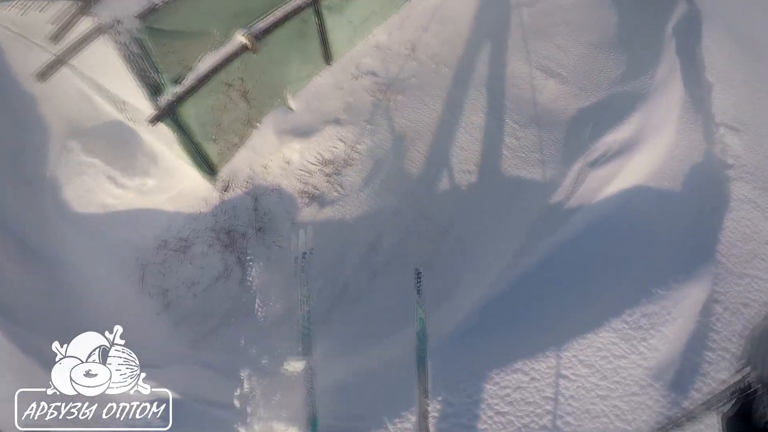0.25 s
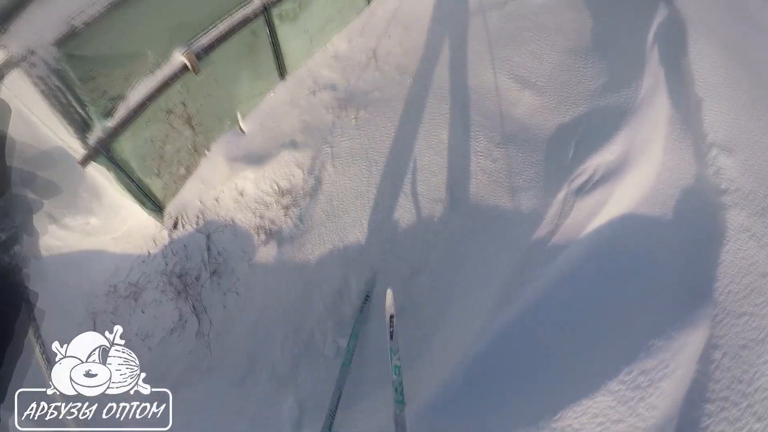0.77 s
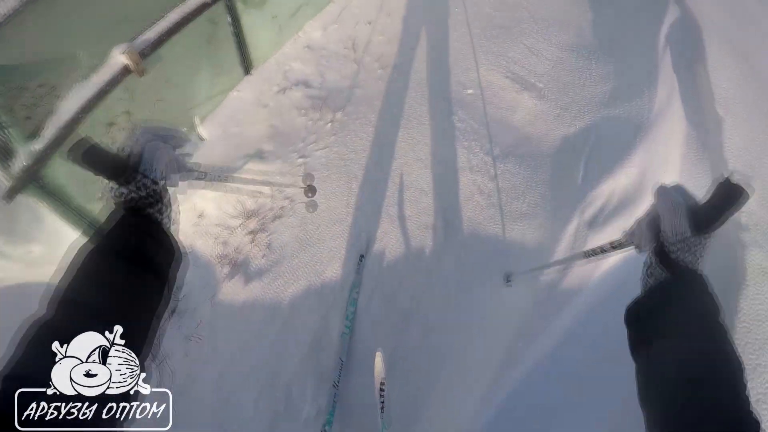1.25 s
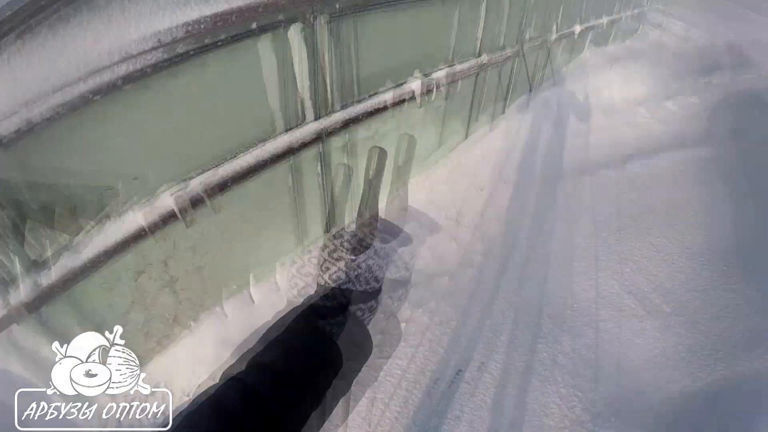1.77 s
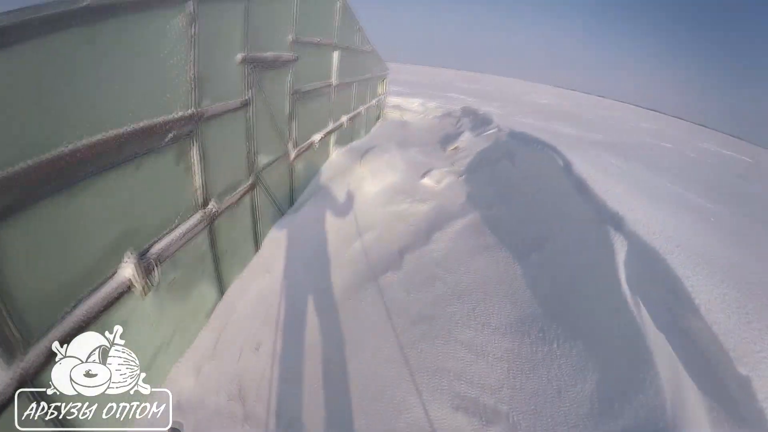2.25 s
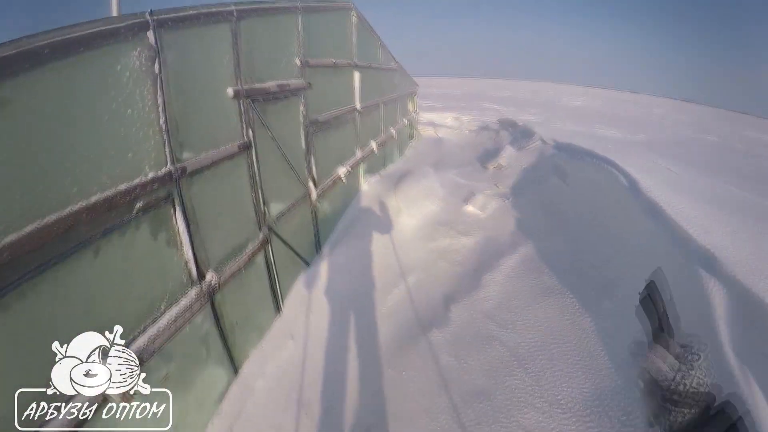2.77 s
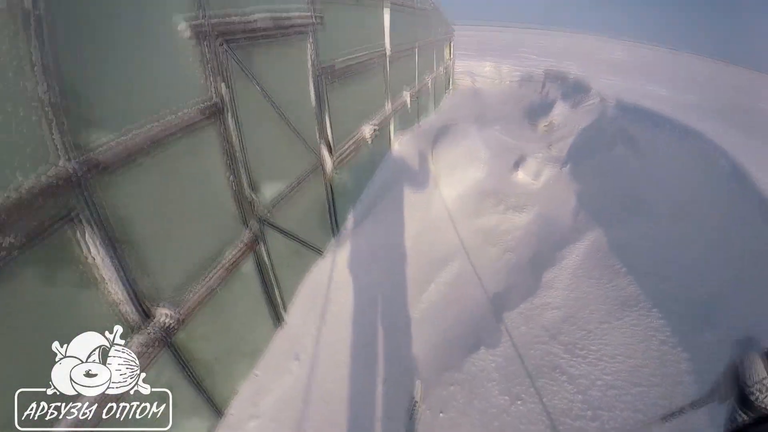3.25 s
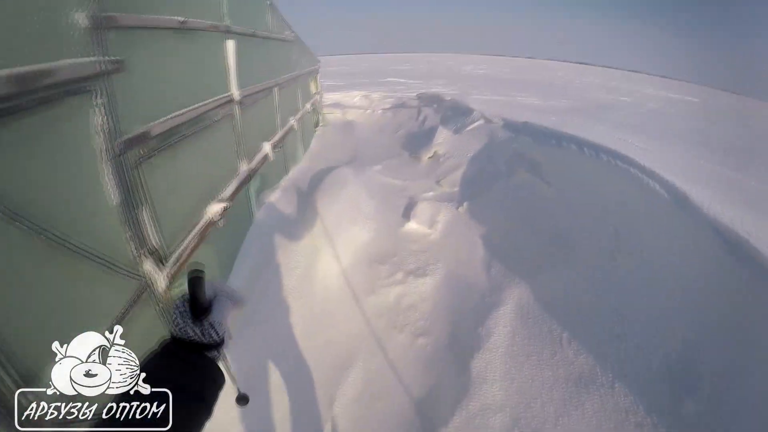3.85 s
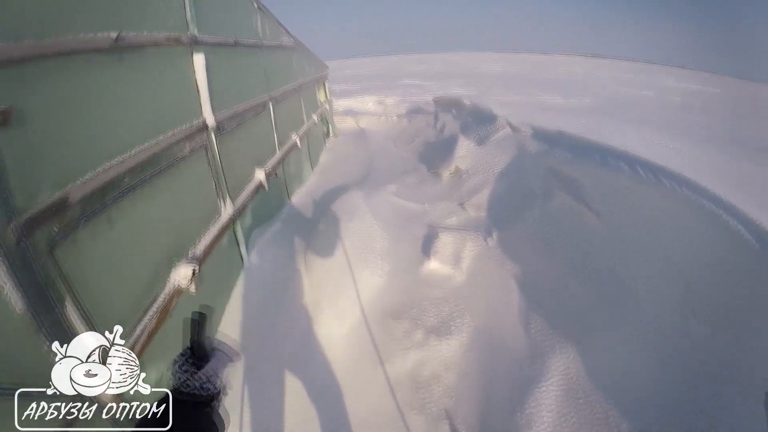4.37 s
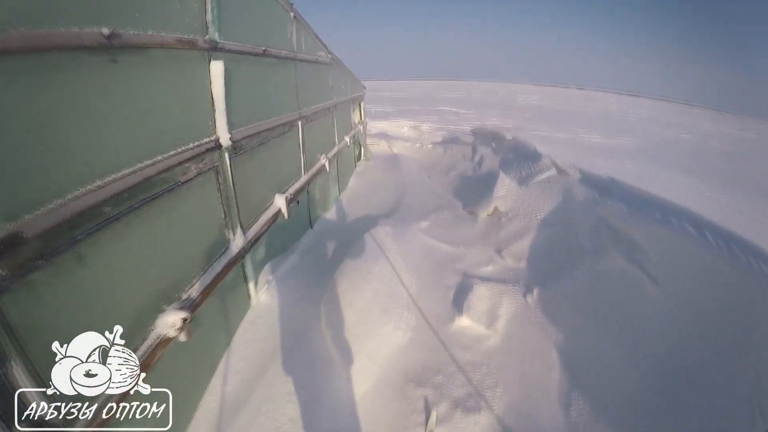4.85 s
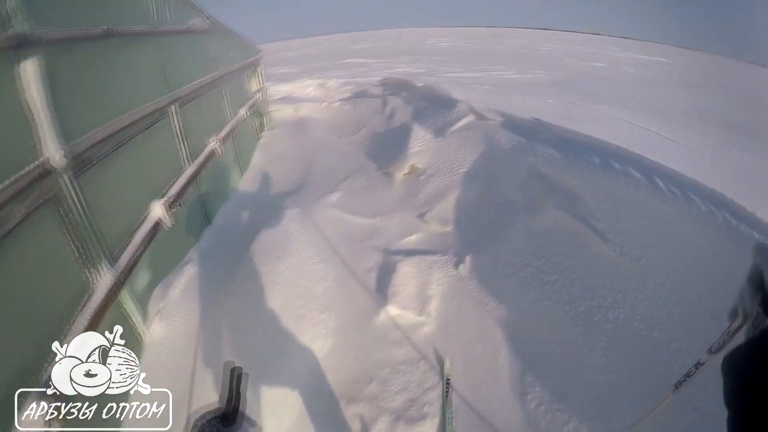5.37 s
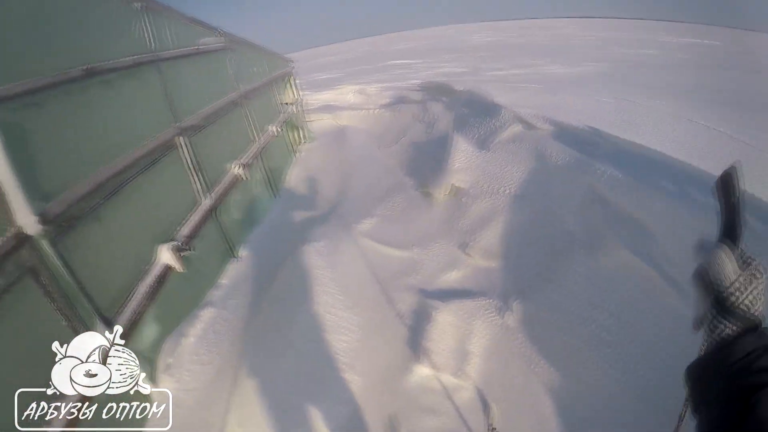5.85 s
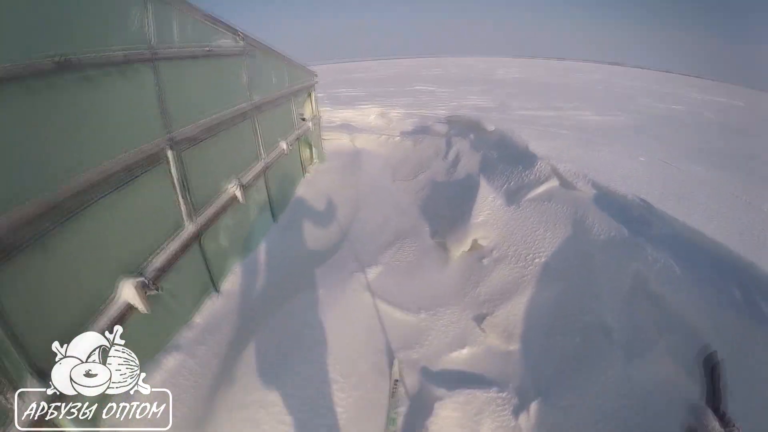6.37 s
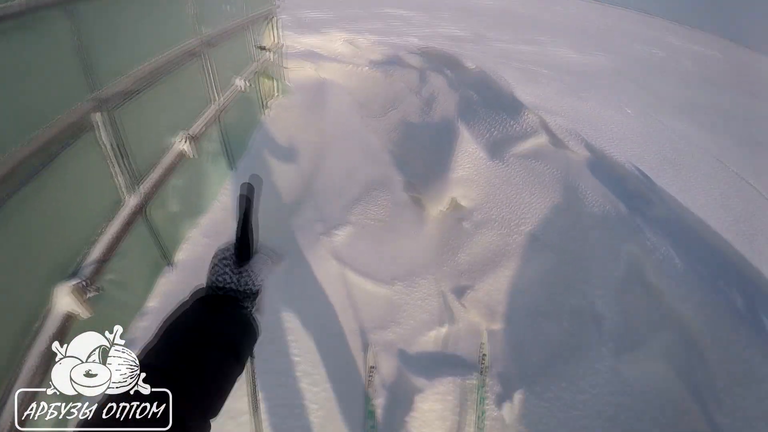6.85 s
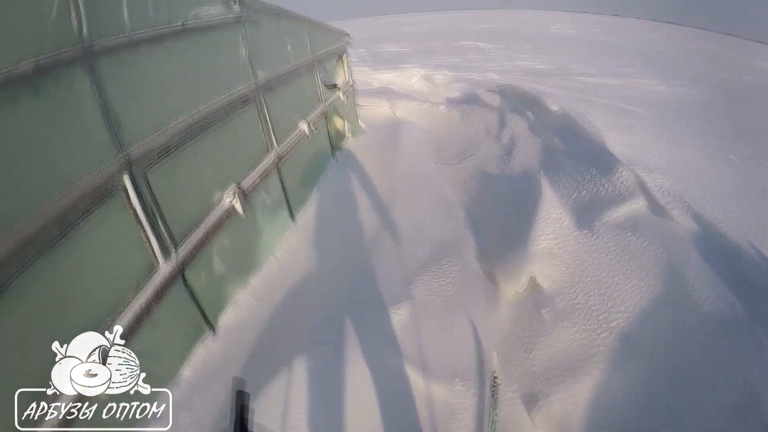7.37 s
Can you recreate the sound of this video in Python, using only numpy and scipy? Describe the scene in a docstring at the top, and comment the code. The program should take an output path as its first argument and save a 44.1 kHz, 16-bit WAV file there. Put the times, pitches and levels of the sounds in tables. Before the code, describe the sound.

Wind thumps against an enclosed microphone as a skier crunches unevenly through hard snow, with rustling clothes and a few sharp knocks.

```python
"""Skiing through crusted snow

A skier with poles shuffles over wind-packed snow, heard from inside a closed housing on the helmet.
Skis crush the snow, the crust snaps in short bursts, and pole tips bite and creak. Clothing and sliding
snow rustle, jolts knock the housing, and wind buffets it with a low, lumpy rumble."""
import sys
import numpy as np
from scipy import signal
from scipy.fft import rfft, irfft, next_fast_len
from scipy.io import wavfile
from scipy.ndimage import uniform_filter1d, map_coordinates

SR = 44100
rng = np.random.default_rng(int(sys.argv[2]) if len(sys.argv) > 2 else 0)


def to_wav(sig):
    """Store sig (one row per channel, or 1-D mono) as 16-bit WAV at the path in sys.argv[1].

    Samples outside -1..1 are clipped; the rate is SR.
    """
    pcm = np.clip(np.atleast_2d(sig), -1, 1) * 32767
    pcm = np.round(pcm).astype(np.int16)
    wavfile.write(sys.argv[1], SR, pcm.T)  # frames by channels


N = 336042

# Weight on a ski: (peak time [s], level [dB], 20 dB rise [s], 20 dB fall [s])
SKI_LOADS = [(.74, -52, 0.06, 0.1), (.82, -55, .1, .05), (1.485, -33.5, 0.042, 0.0655),
             (1.56, -43, 0.1, 0.26), (1.88, -41.5, 0.11, 0.0546), (2.42, -40.5, 0.126, 0.08),
             (2.56, -36, 0.11, 0.08), (2.65, -43, .1, .16), (3.0, -45, 0.178, 0.1962),
             (3.4, -53.5, 0.096, 0.14), (3.75, -37, 0.1345, 0.1976), (3.83, -40, 0.11, 0.1319),
             (3.96, -43, 0.063, .08), (4.115, -43, 0.0102, 0.08), (4.46, -44.5, 0.194, 0.1047),
             (4.68, -45.5, .2, 0.05), (4.81, -43.5, 0.205, 0.1849), (5.49, -54, 0.098, 0.31),
             (5.94, -49.5, 0.0193, 0.05), (6.37, -43, 0.163, 0.1318), (6.88, -53, 0.117, 0.22),
             (7.07, -50.5, 0.049, 0.0131), (7.197, -45, 0.016, 0.1472)]
# Spectrum of packed snow giving way: (frequency [Hz], relative density [dB])
CRUSH_SPECTRUM = [(71, -22), (120, 0.5), (324, -4.5), (449, -8.5), (1650, 0.5), (2830, 1.5), (3270, -14),
                  (6050, -21), (9000, -72), (11700, -28), (19800, -120)]
def ski_crush():
    """Compaction: snow collapses under load, radiating grainy noise over a weak, steady trail."""
    rustle_db, _ = curves(FRICTION_LEVELS)
    trail = amp(np.minimum(rustle_db - 7, -58.5))
    grains = filtered(gritty(clump_db=1.6, grain_db=1.8), colour(CRUSH_SPECTRUM))
    return np.hypot(swells(SKI_LOADS, bend=1.45), trail) * unit(grains)


# Breaks in the crust, and one longer swell at 2.36 s: (time [s], level [dB], brightness [dB], ring frequency
# [Hz], decay [s])
CRUST_BREAKS = [(0.7348, -40.5, 2, 2540, 0.0105), (0.848, -45, 2.5, 3050, 0.0143),
                (0.8898, -38, -6, 3740, 0.0073), (0.9031, -35, -6, 3850, .0071),
                (0.9512, -35, -1.5, 2830, 0.00864), (1.032, -38.5, -2, 3320, 0.0082),
                (1.0501, -38.5, -0.5, 3110, 0.0105), (1.116, -32, -9.5, 2940, 0.0138),
                (1.193, -31, -2.5, 2460, 0.0376), (1.2371, -28, -21.5, 2930, 0.0067),
                (1.330, -14.5, -12, 2800, 0.006), (1.351, -24, -4, 2810, 0.0132),
                (1.3789, -25.5, -21, 2890, 0.0089), (1.618, -30, -14, 2700, .008),
                (1.974, -33, -12, 2550, .006), (2.145, -35, -10, 2550, .012), (2.303, -29, -9, 2420, 0.047),
                (2.3599, -28.5, -4.5, 1770, 0.046), (2.4013, -28.5, -7.5, 2400, .023),
                (3.254, -18.5, -2, 2400, 0.01046), (3.28, -35, 0, 2440, 0.0278),
                (3.372, -29.5, -8.5, 2580, 0.0095), (3.395, -30, -9.5, 1580, 0.0215),
                (3.448, -29, -8.5, 1580, 0.0147), (3.53, -37, -3, 2500, .018),
                (3.635, -31.5, -10, 2180, 0.0083), (3.948, -21, -8, 2600, 0.0205),
                (4.112, -27.5, 2, 2620, 0.0143), (4.772, -32.5, 0, 2150, 0.0139),
                (4.8534, -28, -6, 2450, .011), (5.029, -36, -3, 3140, 0.0203),
                (5.1242, -42.5, 3, 2510, 0.017), (5.213, -36.5, -3, 2590, 0.0226),
                (5.38, -44.5, 2.5, 2590, 0.0186), (5.4679, -39.5, 3, 2710, 0.012),
                (5.4906, -35.5, -5.5, 1690, 0.0293), (5.6963, -33.5, -6, 2550, 0.0505),
                (5.766, -31, -9, 2850, 0.047), (5.8169, -32, -9, 2710, 0.047),
                (5.9386, -36, -19, 1730, 0.0137), (6.224, -36.5, -7, 1750, 0.025),
                (6.313, -25.5, -11, 1590, 0.0254), (6.3282, -21, 4, 2910, 0.0064),
                (6.386, -34.5, -1, 2490, 0.048), (6.8492, -16, -13.5, 3164, 0.0159),
                (6.883, -21, -10, 2850, 0.014), (6.9596, -30.5, -12, 2840, 0.0119),
                (7.0587, -24.5, -3, 3060, 0.0188), (7.135, -35, -9, 2810, 0.0107),
                (7.192, -24.5, -9, 2300, 0.0286)]
def crust_snaps(crack_db=-4, crack_s=0.00206, run_up_s=0.0022):
    """Brittle fracture: a crack and a ragged burst of grains ring the slab and the housing."""
    out, size, lead = np.zeros(N + SR), 8192, round(.015 * SR)
    t, hz = (np.arange(size) - lead) / SR, np.fft.rfftfreq(size, 1 / SR)
    for s, db, bright_db, ring_hz, decay_s in CRUST_BREAKS:
        crack = amp(bright_db + crack_db) * np.exp(-(t / crack_s) ** 2)
        crumble = np.exp(-(np.maximum(t, 0) / decay_s) ** 2)
        run_up = np.where(t < 0, 0.6 * np.exp(np.minimum(t, 0) / run_up_s), 1)  # faint cracks run ahead
        ragged = amp(2.58 * np.repeat(rng.standard_normal(size // 64), 64))
        burst = rfft(run_up * (crack + crumble) * ragged * rng.standard_normal(size))
        slab = resonances(hz, [(ring_hz, 1000, 0)], leak_db=-12) / (1 + ring_hz / (1.3j * hz + 1))
        dull = irfft(burst * housing_low(hz) * slab)
        sharp = irfft(burst * housing_high(hz) / (1 + 1j * hz / 9000))
        snap = dull / abs(dull).max() + amp(bright_db) * sharp / abs(sharp).max()
        out[round(s * SR) - lead:][:size] += amp(db) * snap
    return out[:N]


# Cloth and sliding snow: (time [s], rustle level [dB], sizzle level [dB])
FRICTION_LEVELS = [(0, -76, -88), (.3, -64.5, -68), (.62, -65, -74.5), (.95, -62.5, -69.5),
                   (1.15, -53.5, -65), (1.42, -49, -57), (1.55, -43.5, -53), (1.72, -43.5, -52),
                   (1.8, -48.5, -59), (1.95, -44, -54), (2.25, -47.5, -56), (2.68, -47.5, -54),
                   (2.8, -55.5, -62.5), (3.2, -54, -62), (3.4, -48.5, -55), (3.62, -51.5, -59.5),
                   (3.82, -43, -60), (4.02, -53.5, -65), (4.2, -51.5, -58.5), (4.7, -53, -65.5),
                   (5.01, -60, -66.5), (5.3, -53.5, -61), (5.7, -54, -63), (6.07, -59, -68),
                   (6.36, -50, -57.5), (6.5, -57, -64), (6.72, -55.5, -55.5), (6.83, -59, -68),
                   (7.3, -52.5, -58.5), (7.62, -55.5, -63)]
def cloth_and_loose_snow(shake_db=-10, spray_db=-21.5):
    """Sliding friction: cloth and loose snow make noise that swells with each load on a ski."""
    rustle_db, sizzle_db = curves(FRICTION_LEVELS)
    load = swells(SKI_LOADS, bend=1.45)
    crystals = crackle(per_second=45, spread_db=4)
    rustle = patchy(gritty(clump_db=2.2, grain_db=2.2) * crystals ** 0.727, depth_db=1.16)
    sizzle = patchy(gritty(clump_db=1.8, grain_db=1.4) * crystals, depth_db=3.6)
    return (np.hypot(amp(shake_db) * load, amp(rustle_db)) * unit(filtered(rustle, housing_low))
            + np.hypot(amp(spray_db) * load, amp(sizzle_db)) * unit(filtered(sizzle, housing_high)))


# Modes of the pole's tube: (frequency [Hz], gain [dB])
TUBE_MODES = [(1867, 0), (2900, 1), (3360, 0), (3850, -4)]
# The tip bites the crust: (time [s], peak level [dB], duration [s])
POLE_PLANTS = [(3.947, -25, .018), (6.85, -21, .035)]
def pole_bites(bandwidth_hz=110):
    """Forced vibration: grains grinding under the tip excite the damped modes of the tube."""
    out, t = np.zeros(N), np.arange(SR // 10) / SR
    modes = [(hz, bandwidth_hz, db) for hz, db in TUBE_MODES]
    for s, db, duration in POLE_PLANTS:
        grind = np.zeros(N)
        grind[round(s * SR):][:len(t)] = rng.standard_normal(len(t)) * np.exp(-(t / duration) ** 4)
        bite = filtered(grind, lambda hz: resonances(hz, modes, leak_db=-40) * housing_low(hz))
        out += amp(db) * bite / abs(bite).max()
    return out


# Creaks under the pole tip: (time [s], level [dB])
CREAKS = [(6.0268, -47), (6.121, -43.5), (6.1676, -44.5), (6.1925, -44.5)]
# Harmonics of a creak: (frequency [Hz], relative level [dB])
CREAK_HARMONICS = [(1390, -9), (2780, 2), (4170, -6), (5560, -14)]
def snow_creaks():
    """Stick-slip: cold snow grips and releases periodically, giving a brief harmonic tone."""
    out, t = np.zeros(N + SR), np.arange(SR // 30) / SR
    envelope = np.exp(-((t - .002) / 0.00555) ** 2)
    for s, db in CREAKS:
        detune = 1 + 0.0169 * rng.standard_normal()
        tone = sum(amp(level) * np.sin(2 * np.pi * hz * detune * t) for hz, level in CREAK_HARMONICS)
        out[round(s * SR):][:len(t)] += amp(db) * tone * envelope
    return out[:N]


# Jolts to the housing: (time [s], tick level [dB], thump level [dB], sway level [dB])
JOLTS = [(1.4884, -8.5, -11, -26.5), (3.8232, -12, -19, -30), (6.3697, -18, -21, -15.5)]
def housing_knocks(sway_hz=52, sway_s=0.0237, sway_lead_s=0.0074):
    """Impulse excitation: the shell ticks and the microphone swings heavily while the mount rocks."""
    out, t = np.zeros(N + SR), np.arange(SR // 8) / SR
    tick = -np.sin(2 * np.pi * 1900 * t) * amp(-60 * t / 0.0042)
    attack = 1 - np.exp(-t / 0.000367)
    thump = np.sin(2 * np.pi * 42 * t + 1.02) * amp(-60 * t / 0.041) * attack
    for s, tick_db, thump_db, sway_db in JOLTS:
        out[round(s * SR):][:len(t)] += amp(tick_db) * tick + amp(thump_db) * thump
        since = np.arange(N + SR) / SR - s
        envelope = np.exp(-((since + sway_lead_s) / sway_s) ** 2)
        out += amp(sway_db) * np.sin(2 * np.pi * sway_hz * since) * envelope
    return out[:N]


# Spectrum of the eddies: (frequency [Hz], relative density [dB])
EDDY_SPECTRUM = [(12, -11.5), (20, 5), (38, 5), (56, 2), (73, -13.5), (102, -21.5), (140, -34), (400, -46),
                 (520, -46.5), (880, -120)]
# Steady buffeting: (time [s], level [dB])
WIND_LEVELS = [(0, -54.5), (.5, -46), (1.0, -43), (1.55, -38.5), (2.2, -34), (2.75, -35.5), (2.99, -43.5),
               (3.33, -35.5), (4.24, -37.5), (4.52, -40.5), (5.0, -37), (5.4, -38), (6.73, -43),
               (7.19, -38), (7.62, -39)]
# Single heavy eddies: (peak time [s], level [dB], 20 dB rise [s], 20 dB fall [s])
HEAVY_EDDIES = [(1.06, -32.5, 0.163, 0.12), (1.49, -26, 0.059, 0.17), (1.66, -28, 0.192, 0.2154),
                (2.24, -25.5, 0.183, .1), (2.34, -21.5, 0.077, 0.07), (2.44, -21, 0.06, 0.05),
                (2.6, -30.5, 0.144, 0.21), (3.2, -23.5, 0.182, 0.1462), (3.47, -21.5, 0.142, 0.1253),
                (3.84, -18.5, 0.0815, 0.0562), (4.135, -18, 0.0588, 0.0732), (4.87, -20, .1, 0.0759),
                (5.49, -23, 0.0675, 0.2278), (6.36, -25, 0.103, 0.2047), (7.0, -27, 0.097, 0.2641),
                (7.2, -27.5, 0.18, 0.1444), (7.38, -29.5, 0.087, 0.33)]
def wind():
    """Turbulence: the fluctuating pressure of eddies thumps the housing in low lumps."""
    level_db, = curves(WIND_LEVELS)
    pressure = rng.standard_normal((2, N)) * amp(2.5 * wobble(12))
    steady, heavy = filtered(pressure, colour(EDDY_SPECTRUM))
    envelope = uniform_filter1d(abs(signal.hilbert(heavy)), size=1500)
    swing = heavy / envelope ** .65  # evened out, so each heavy eddy swings fully
    return amp(level_db) * unit(steady) + swells(HEAVY_EDDIES, bend=1.003) * unit(swing)


# Cavity modes of the housing: (frequency [Hz], bandwidth [Hz], gain [dB])
CAVITY_MODES = [(1727.6, 215.4, 2.5), (2559, 380, 2.5), (2954, 426, -7.5), (4202, 330, -6.5),
                (6377, 980, -9.5), (7382, 715, -11.5), (9555, 1320, -17.5), (13400, 1440, -26.5)]
def housing_low(hz):
    """Cavity resonance: the lower modes; the sealed shell passes little below or above them."""
    low, high = 1j * hz / 1350, 1j * hz / 5200
    highpass = low ** 2 / (1 + 1.215 * low + low ** 2)
    lowpass = 1 / (1 + 1.185 * high + high ** 2)
    return resonances(hz, CAVITY_MODES[:4], leak_db=-24) * highpass * lowpass


def housing_high(hz):
    """Cavity resonance: the upper modes; the shell dulls the very top."""
    low = 1j * hz / 4200
    highpass = low ** 2 / (1 + 1.667 * low + low ** 2)
    lowpass = 1 / (1 + 1j * hz / 13000) ** 2
    return resonances(hz, CAVITY_MODES[3:], leak_db=-94) * highpass * lowpass


def resonances(hz, modes, leak_db):
    """Modal superposition: damped resonators add to a weak direct path."""
    return amp(leak_db) + sum(amp(db) * 1j * hz * width / (centre ** 2 - hz ** 2 + 1j * hz * width)
                              for centre, width, db in modes)


def gritty(clump_db, grain_db):
    """Amplitude modulation: white noise in clumps of about 30 ms and grains of about 1 ms."""
    return rng.standard_normal(N) * amp(clump_db * np.tanh(wobble(35)) + grain_db * wobble(700))


def crackle(per_second, spread_db, decay_s=0.00807):
    """Poisson process: a gain that jumps and decays as single crystals break."""
    hits = (rng.random(N) < per_second / SR) * amp(spread_db * rng.exponential(size=N))
    return 1 + signal.lfilter([.6], [1, -np.exp(-1 / (decay_s * SR))], np.minimum(hits, 6))


def patchy(x, depth_db):
    """Spectral modulation: the timbre drifts in random patches of about 1.5 kHz by 100 ms."""
    spectra = signal.stft(x, nperseg=256)[2]
    bands = uniform_filter1d(rng.standard_normal(spectra.shape), size=9, axis=0)
    patches = uniform_filter1d(bands, size=36, axis=1)
    return signal.istft(spectra * amp(depth_db * unit(patches)), nperseg=256)[1][:N]


def swells(rows, bend):
    """Incoherent addition: rising and falling gains sum in power; more bend rounds their tops."""
    t = np.arange(N) / SR
    return np.sqrt(sum(amp(db - 20 * np.maximum((s - t) / rise, (t - s) / fall) ** bend) ** 2
                       for s, db, rise, fall in rows))


def wobble(rate):
    """Spline interpolation of random knots, rate of them a second."""
    return map_coordinates(rng.standard_normal(N // 40), [np.arange(N) * rate / SR])


def curves(rows):
    """Linear interpolation in time of each later column, one value per sample."""
    times, *columns = np.transpose(rows)
    return [np.interp(np.arange(N) / SR, times, column) for column in columns]


def colour(points):
    """Spectral envelope: gain through (frequency [Hz], level [dB]) points on a log axis."""
    knots_hz, db = np.transpose(points)
    return lambda hz: amp(np.interp(np.log(hz + 1), np.log(knots_hz + 1), db))


def filtered(x, response):
    """Linear filtering: the spectrum of x times a frequency response."""
    size = next_fast_len(N + SR // 2)
    return irfft(rfft(x, size) * response(np.fft.rfftfreq(size, 1 / SR)), size)[..., :N]


def amp(db):
    """Amplitude ratio of a level in dB."""
    return 10 ** (np.asarray(db) / 20)


def unit(x):
    """Normalisation to rms 1."""
    return x / np.sqrt(np.mean(x ** 2) + 1e-20)


def scene():
    """Superposition: all sources add at one microphone."""
    return (wind() + ski_crush() + cloth_and_loose_snow() + crust_snaps()
            + pole_bites() + snow_creaks() + housing_knocks())[None]


def record(dry):
    """Band limiting: the response tapers to zero at 15.5 kHz."""
    return filtered(dry, lambda hz: np.clip((15500 - hz) / 900, 0, 1))


dry = scene()
out = record(dry)
to_wav(out)
```